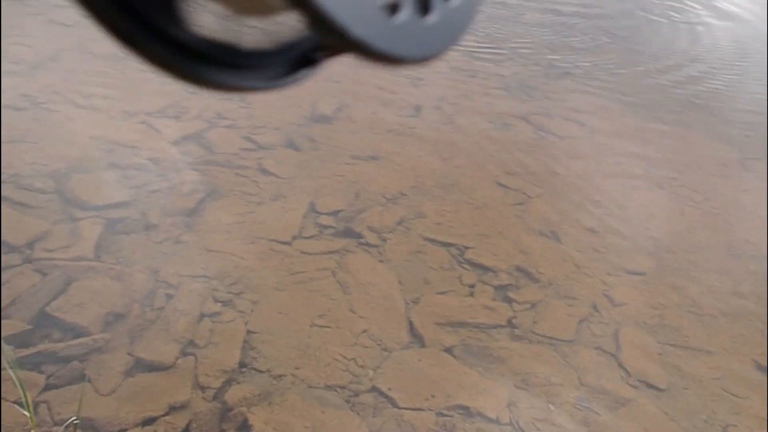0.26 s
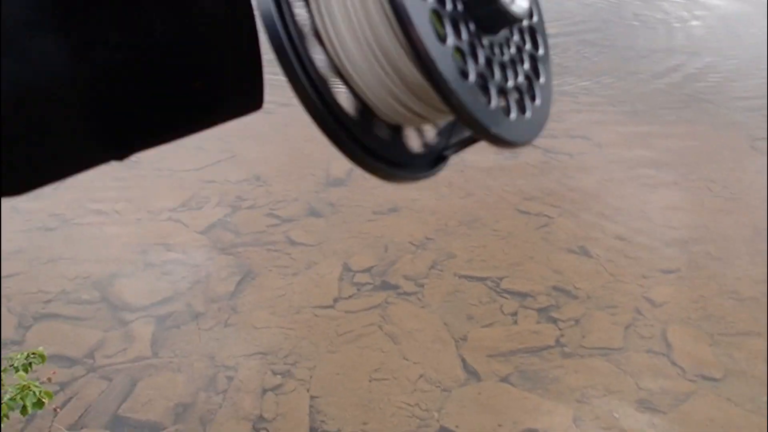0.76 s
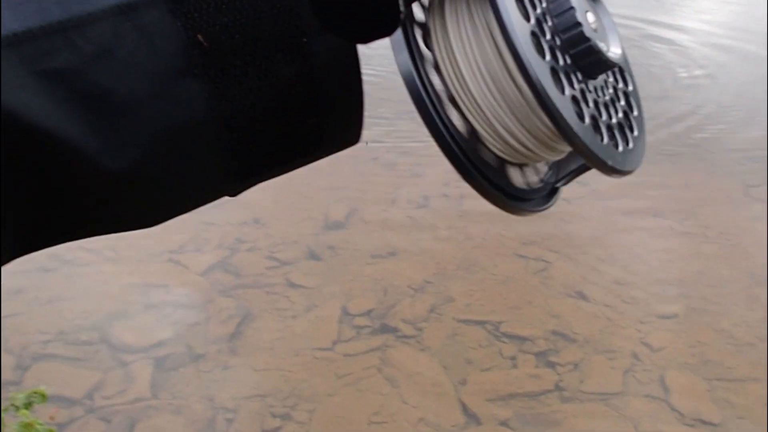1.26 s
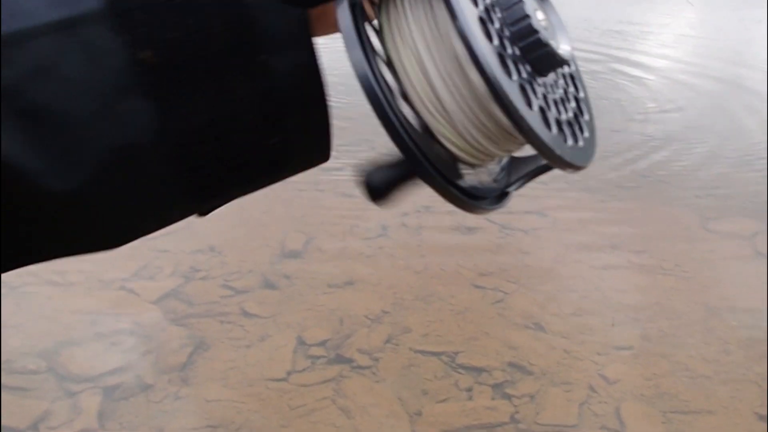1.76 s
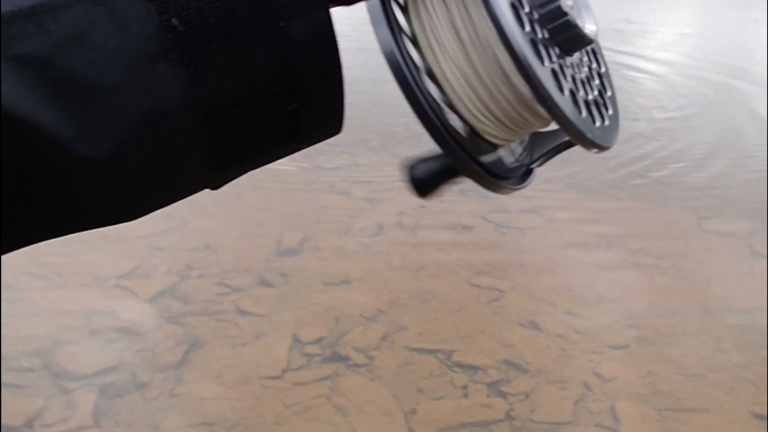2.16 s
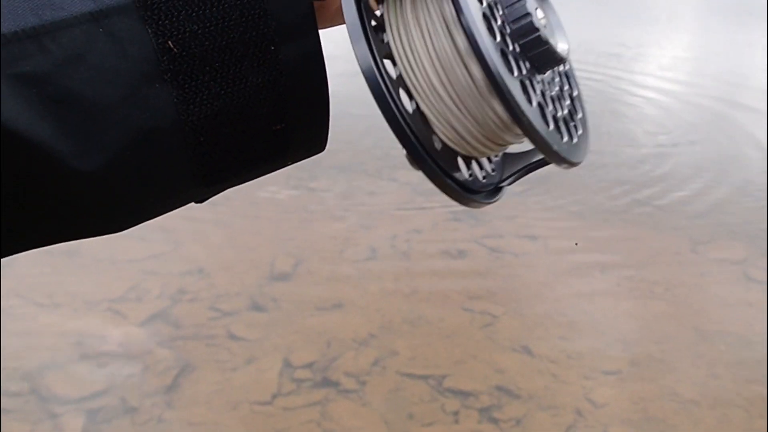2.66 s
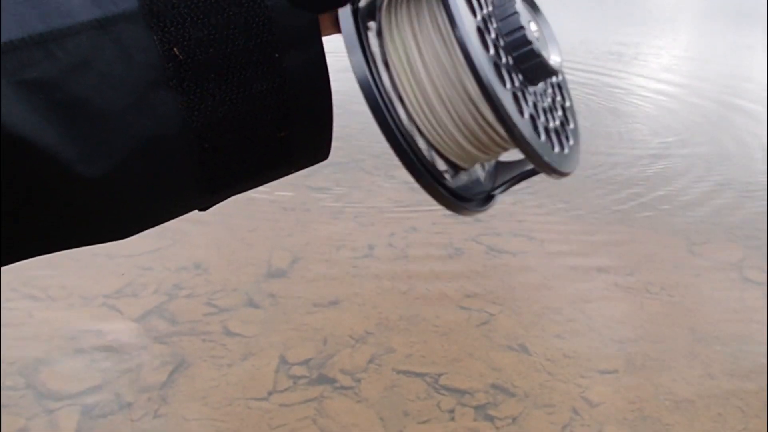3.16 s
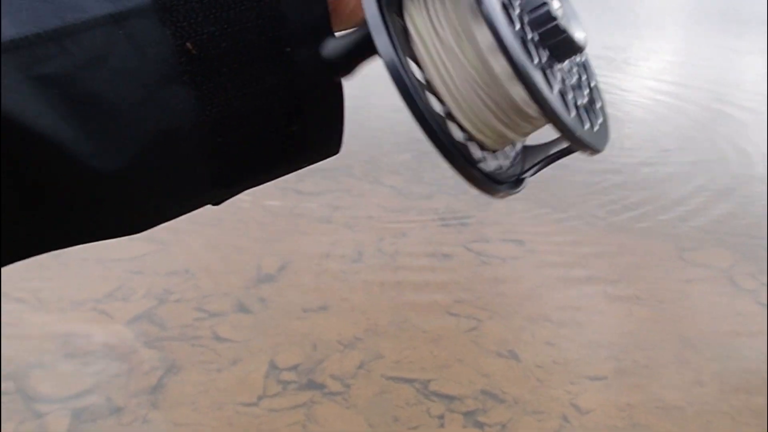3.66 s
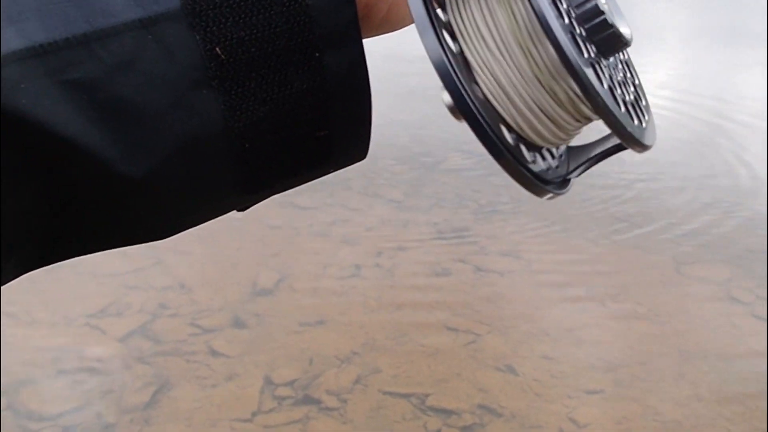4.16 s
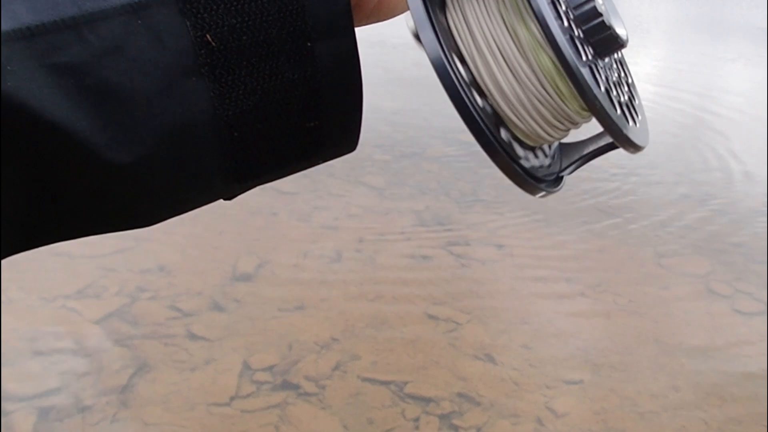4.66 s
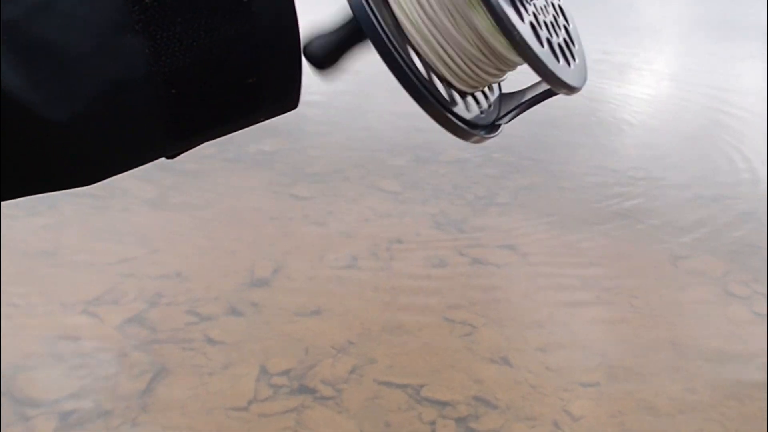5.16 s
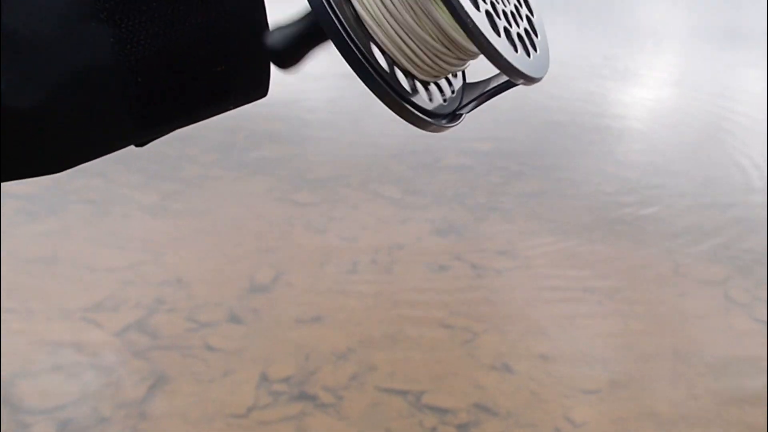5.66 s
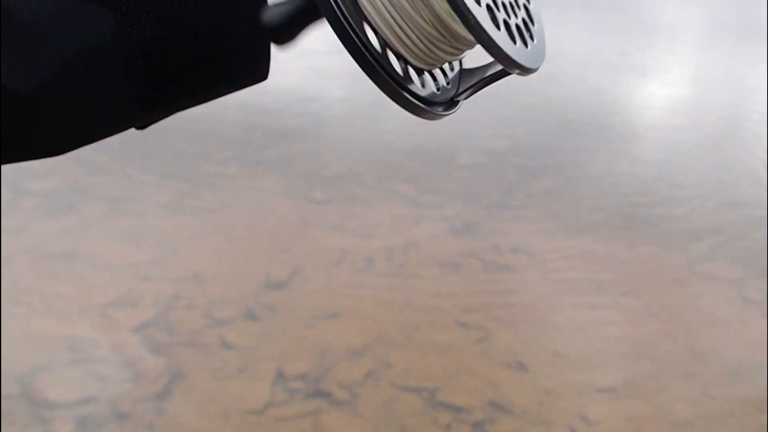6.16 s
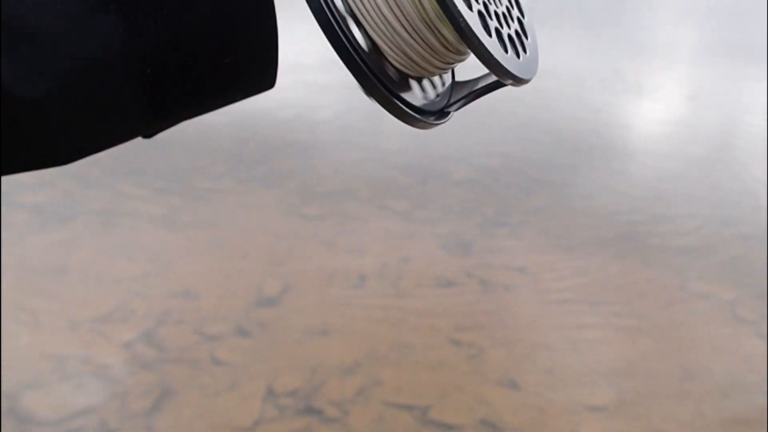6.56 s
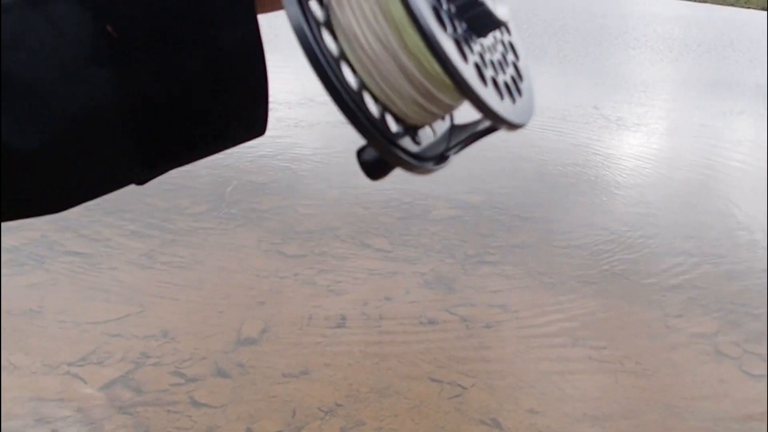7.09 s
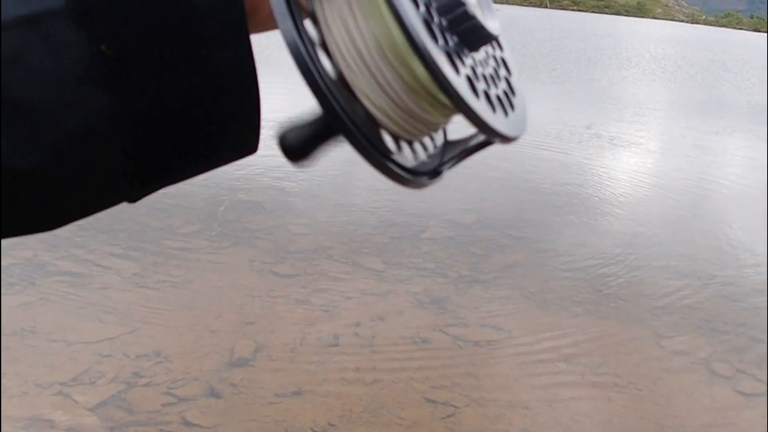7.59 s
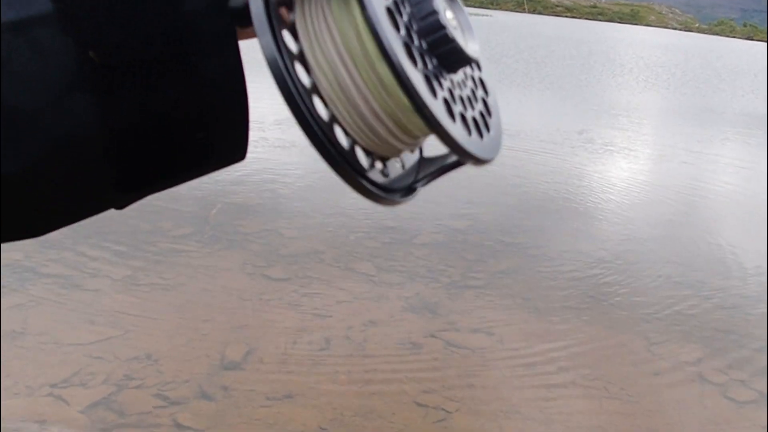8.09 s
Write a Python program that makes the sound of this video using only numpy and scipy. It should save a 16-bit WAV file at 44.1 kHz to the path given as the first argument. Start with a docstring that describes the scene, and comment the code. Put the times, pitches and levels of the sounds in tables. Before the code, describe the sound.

Close, high-pitched ratcheting of a fishing reel speeds up and slows as line pulls out, with faint finger knocks and distant water.

```python
"""Fly reel beside open water

Close on the reel, with a phone's two microphones. Line pays out in surges: a sprung pawl snaps over
the sixteen notches of the spool, which beams the clicks in lobes as it turns. Just as near, fingers
knock and rub on rod and reel and gusts thump the microphone ports. Water murmurs far behind."""
import sys
import numpy as np
from scipy import signal
from scipy.fft import rfft, irfft, next_fast_len
from scipy.io import wavfile
from scipy.ndimage import uniform_filter1d

SR = 44100
rng = np.random.default_rng(int(sys.argv[2]) if len(sys.argv) > 2 else 0)


def to_wav(s):
    """Save 16-bit WAV."""
    ch = np.atleast_2d(s).T  # columns
    pcm = np.round(np.clip(ch, -1, 1) * 32767)  # PCM
    wavfile.write(sys.argv[1], SR, pcm.astype(np.int16))


N = 367353

# turning of the spool, one table for each pull between two stops: (notches passed [count], time [s])
SPOOL_PULLS = [
    [(0, 0.0578), (2, 0.0848), (4, 0.109), (18, 0.298), (23, 0.3888), (25, 0.4467), (27, 0.5372),
     (31, 0.6763), (32, 0.7115), (42, 0.9447), (44, 1.0009), (45, 1.0203), (52, 1.1068), (60, 1.2155),
     (67, 1.3152), (70, 1.371), (71, 1.4032), (72, 1.467)],
    [(73, 1.7451), (75, 1.8083), (78, 1.8592), (80, 1.8854), (82, 1.9084), (98, 2.0801), (102, 2.1246),
     (109, 2.2363), (112, 2.304), (113, 2.3461), (114, 2.4279)],
    [(115, 2.5527)],
    [(116, 2.7269), (119, 2.9274), (120, 2.9667), (128, 3.1436), (129, 3.1627), (137, 3.2801),
     (139, 3.3211), (140, 3.3483), (141, 3.3713), (147, 3.5037), (151, 3.6369), (152, 3.6895),
     (153, 3.7286), (158, 3.8945), (159, 3.9406)],
    [(160, 4.0531), (161, 4.1482), (162, 4.1911), (164, 4.2913), (165, 4.3223), (170, 4.4123),
     (188, 4.6427), (196, 4.8158), (197, 4.8549), (198, 4.9068)],
    [(199, 5.1168), (200, 5.1659), (201, 5.1968), (212, 5.4187), (214, 5.4889), (215, 5.5468),
     (217, 5.6408), (219, 5.7419), (220, 5.7711), (223, 5.827), (242, 6.0667), (249, 6.1886), (251, 6.2569),
     (254, 6.4094), (255, 6.4555), (257, 6.5432), (259, 6.5983), (266, 6.7424), (280, 6.9918),
     (281, 7.0161), (286, 7.1424), (287, 7.1796), (288, 7.2434), (292, 7.4222), (294, 7.5064),
     (301, 7.7105), (302, 7.7461), (305, 7.854), (308, 7.9844), (311, 8.194)],
]
# resonances heard in each click, from reel and microphone ports together:
# (pitch [Hz], t60 [s], level [dB], left minus right [dB])
CLICK_RESONANCES = [(2916, 0.0062, -25.5, 2), (3558, 0.0064, -11.5, -15), (4800, 0.0032, -5.5, 7),
                    (5400, 0.0056, -4.5, 2), (6670, 0.0023, -24.5, -16), (7697, 0.0042, -6.5, -1.5),
                    (8496, 0.0045, -9, -2)]
# sway in pitch of each resonance, twice a turn: (depth [share of pitch], phase [turns])
PITCH_SWAY = [(0, 0), (0, 0), (.015, .3), (.015, .68), (0, 0), (.01, .5), (.01, .3)]
# the clicks as the hand holds the reel: (time [s], level [dB], treble gain [dB],
# third resonance gain [dB], fourth resonance pitch [Hz], fourth resonance t60 [s])
HAND_HOLD = [(0, 1.5, -3.5, 3, 5540, 0.0043), (.2, 6, 0, -6.5, 5440, .005),
             (.5, 3.5, -1.5, -1.5, 5370, 0.0042), (1, 1, -1, -3.5, 5250, 0.006),
             (1.35, 2, -3, -3, 5410, 0.0063), (2, 2, -3.5, -3.5, 5400, 0.0054),
             (2.6, 2, -3, -3, 5440, 0.0058), (3.3, 2, -3, -4, 5390, 0.0051), (4, 1, -2, -3, 5360, .0046),
             (4.6, 1.5, -2.5, 0.5, 5470, 0.005), (6, 1, -.5, 1, 5400, .0042),
             (6.5, 1, -0.5, -1, 5450, 0.0045), (7, 1, -1.5, -0.5, 5390, 0.0039),
             (7.6, 0, -1.5, 0, 5380, 0.004), (8.3, -0.5, -4.5, -1, 5290, 0.0047)]
# snap of the pawl above the resonances: (t60 [s], level [dB], spectrum as (frequency [Hz], level [dB]))
SNAP_BANDS = [(0.01, -28, [(8500, -15), (9600, -1), (11500, 0), (12200, -12), (13000, -37)]),
              (0.0061, -25, [(11500, -25.5), (12600, -8), (14500, -2.5), (15400, -1.5), (16500, -28)])]
# lobes in the level of each resonance, then each snap band, as the spool turns:
# (gain [dB], then depth [0-1] and phase [turns] for one, two and three lobes a turn)
SPOOL_LOBES = [(-1, 0.35, 0.77, 0.031, 0.089, .05, .89), (-3.5, 0.24, 0.74, 0.024, 0.38, .02, 0.58),
               (2, 0.4, 0.7, 0.42, 0.42, .12, 0.62), (2, 0.081, 0.12, 0.48, .32, 0.057, 0.088),
               (3.5, 0.15, 0.21, 0.15, 0.24, .5, 0.91), (-1.5, 0.62, 0.097, 0.1, 0.64, 0.2, 0.94),
               (1, 0.18, 0.6, 0.44, 0.28, 0.28, 0.91), (0, 0.25, 0.46, 0.12, 0.59, 0.11, 0.96),
               (4, 0.17, .03, .26, 0.3, 0.12, 0.34)]
# rattle of line and bearing: (frequency [Hz], level [dB])
WHIRR_SPECTRUM = [(1500, -23), (2600, 0.5), (3200, -1), (3550, 3), (4100, -3.5), (5200, 2.5), (6500, -17),
                  (8000, 0.5), (10000, -27), (15500, -25)]
# something hard ticks on the reel: (time [s], level [dB], pitch [Hz], t60 [s])
REEL_TICKS = [(0.8676, -8.5, 4420, 0.013), (0.972, -17, 5260, 0.011), (0.9786, -14, 6170, 0.028),
              (0.982, -12.5, 5880, 0.021), (0.9866, -19, 3250, 0.025), (0.9917, -19, 5230, 0.02),
              (1.015, -9.5, 5060, 0.014), (1.3923, -11.5, 7270, 0.016), (1.3961, -10, 5350, 0.016),
              (1.7945, -23, 3580, 0.022), (1.8035, -7, 3540, 0.018), (1.8182, -12, 4700, 0.029),
              (1.8484, -11.5, 5340, 0.014), (2.9004, -25, 4800, 0.015), (2.9068, -18.5, 4620, 0.041),
              (3.24, -21, 3700, 0.018), (3.246, -4, 4800, 0.0067), (3.3075, -14, 6960, 0.021),
              (3.326, -14, 3510, 0.017), (3.487, -32, 5350, 0.013), (6.756, -21, 7000, 0.008),
              (7.9563, -40, 5160, 0.017)]
# knocks on the rod grip: (time [s], level [dB], pitch struck hardest [Hz])
GRIP_KNOCKS = [(.107, -46, 920), (.25, -40, 581), (.376, -41.5, 1140), (0.539, -41, 414), (.69, -28, 640),
               (.815, -31.5, 1260), (.868, -23, 1720), (.939, -9.5, 656), (.972, -23, 1200),
               (1.041, -27.5, 678), (1.0775, -17, 1500), (1.391, -31, 1420), (1.769, -47, 1070),
               (1.808, -24, 1220), (1.928, -33.5, 1830), (2.238, -39, 549), (2.903, -35, 1780),
               (2.956, -37, 1470), (2.995, -40, 1480), (3.242, -21.5, 1520), (3.307, -25.5, 480),
               (3.3263, -19.5, 1150)]
# modes of the grip: (pitch [Hz], level [dB], t60 [s])
GRIP_MODES = [(150, -6, .05), (245, 5.5, 0.038), (660, 4.5, 0.026), (893, 5.5, 0.021), (1080, 2, 0.022),
              (1537, 6, 0.012), (1865, -0.5, 0.018)]
# sleeve and fingers rubbing, one table a stroke: (time [s], level [dB])
RUB_STROKES = [
    [(0.76, -48), (0.938, -40), (1.16, -46)],
    [(1.37, -56), (1.43, -51)],
    [(1.73, -44), (1.91, -44)],
    [(2.88, -55), (2.95, -44)],
    [(3.23, -40.5), (3.41, -44.5)],
    [(4.75, -52), (5.11, -53.5)],
    [(6.25, -49.5), (6.55, -58)],
]
# friction of cloth and skin: (frequency [Hz], level [dB])
RUB_SPECTRUM = [(150, -3.5), (500, -3.5), (1200, 2), (2300, -7.5), (3500, -3.5), (4100, -2), (5000, -9.5),
                (8000, -7), (10000, -21), (16000, -33)]
# sound scattered back by hands and water: (frequency [Hz], level [dB])
ECHO_SPECTRUM = [(300, -27), (2000, 11), (3150, 5), (3520, 12.5), (4000, 0.5), (8000, 3.5), (10000, -4),
                 (16000, -21)]
# strongest eddies: (time [s], level on the port struck harder [dB], left minus right [dB], length [s])
STRONG_EDDIES = [(0.006, -27, -13, 0.041), (2.471, -37.5, -12, 0.0085), (2.516, -35, -7, 0.032),
                 (2.66, -46, 0, 0.034), (3.461, -36, -12, 0.033), (3.489, -44, -20, 0.0091),
                 (3.7, -39, -20, 0.011), (4.192, -43, 14, 0.0085), (4.635, -39, -5, 0.039),
                 (4.676, -31, 18, 0.016), (4.82, -51, -4, 0.034), (6.53, -44.5, 18, 0.016),
                 (6.591, -30.5, 16, 0.025), (6.64, -26.5, -3.5, 0.024), (7.139, -42.5, -18, 0.021),
                 (7.249, -44, 18, 0.01), (7.629, -49, -40, 0.015), (8.32, -39, 26, 0.013)]
# spells of breeze that shed weak eddies: (start [s], end [s], level [dB])
BREEZE_SPELLS = [(2.0, 2.43, -46), (3.54, 3.78, -47), (3.9, 4.02, -48)]
# wind rumble on the ports: (frequency [Hz], level [dB])
WIND_SPECTRUM = [(20, -8), (45, -1), (100, -1.5), (250, -5.5), (400, -17), (800, -33), (2000, -70)]
# murmur of the distant water: (time [s], level [dB])
WATER_LEVEL = [(0.0, -51), (1.09, -50.5), (2.32, -54), (6.03, -53.5), (8.33, -55)]
# colour of that murmur: (frequency [Hz], level [dB])
WATER_SPECTRUM = [(18, -30), (30, 2.5), (100, -3), (350, -1), (650, -0.5), (860, -2), (1500, -1.5),
                  (1900, -2), (2300, -14.5), (3200, -4), (6000, -42)]
# steady hiss on each microphone: (frequency [Hz], level [dB])
HISS_SPECTRUM = [(1500, -7.5), (2600, -46.5), (3600, 9), (4100, -15), (5500, -1), (7700, 7.5), (9200, -1),
                 (15000, -2.5), (16500, -18)]

NOTCHES_PER_TURN = 16


def pawl(scatter_db=2.0, detune=0.014, port_slip_turns=0.029, snap_alike=0.7):
    """Close up: each drop rings all resonances, neighbours in opposite sense, under a treble snap."""
    times = drop_times()
    angle = np.arange(len(times)) / NOTCHES_PER_TURN
    hold = [column[(times * SR).astype(int)] for column in curve(HAND_HOLD)]
    level_db, treble_db, third_db, fourth_hz, fourth_t60 = hold
    beamed = [lobe_gain(row, angle) * undb(level_db + (k >= 4) * treble_db + (k == 2) * third_db)
              for k, row in enumerate(SPOOL_LOBES)]
    out = 0
    for k, (hz, t60, db, left_db) in enumerate(CLICK_RESONANCES):
        if k == 3:
            hz, t60 = fourth_hz, fourth_t60
        force, mistune, jitter, slip = rng.standard_normal((len(times), 4)).T
        gain = beamed[k] * undb(db + scatter_db * force)
        depth, sway_phase = PITCH_SWAY[k]
        pitch = hz * (1 + depth * np.cos(2 * np.pi * (2 * angle - sway_phase)) + detune * mistune)
        phase = 0.1 * jitter + k / 2
        rise = t60 / 9  # each ring swells briefly before dying, which softens the click
        ports = [ring(times, gain, pitch, t60, rise, phase + side * port_slip_turns * slip)
                 for side in (1, -1)]
        out += pan(np.array(ports), left_db)
    for k, (t60, db, spectrum) in enumerate(SNAP_BANDS, len(CLICK_RESONANCES)):
        envelope = decays(times, beamed[k] * undb(db), t60, rise=0.00029)
        grit = blend(rng.standard_normal(N), rng.standard_normal((2, N)), snap_alike)
        out += pan(envelope * colour(grit, spectrum), left_db=-2.5)
    return out


def drop_times():
    """The pawl drops whenever the spool has turned by one more notch."""
    return np.concatenate([spline(notches, times, np.arange(notches[0], notches[-1] + 1))
                           for notches, times in map(np.transpose, SPOOL_PULLS)])


def lobe_gain(row, angle):
    """Gain towards the phone at each angle [turns] of the spool."""
    db, *lobes = row
    swing = sum(depth * np.cos(2 * np.pi * (count * angle - phase))
                for count, (depth, phase) in enumerate(np.reshape(lobes, (-1, 2)), 1))
    return undb(db) * np.abs(1 + swing)


def whirr(db=-46, speed_power=0.69, grain_db=3):
    """Line and bearing rattle louder the faster the spool turns."""
    times = drop_times()
    midpoints = (times[1:] + times[:-1]) / 2
    speed = curve(np.c_[midpoints, 1 / np.diff(times) / 80])[0]  # 1 at eighty notches a second
    grains = rng.standard_normal((2, N)) * undb(grain_db * flicker(300))
    gain = undb(db + curve(HAND_HOLD)[0]) * speed ** speed_power
    return pan(colour(grains, WHIRR_SPECTRUM) * gain, left_db=-3)


def ticks(crack_db=-1, detune=0.096):
    """A hard touch on the reel rings one partial over a short crack of the click resonances."""
    times, db, hz, t60 = np.transpose(REEL_TICKS)
    partial = ring(times, undb(db), hz, t60, rise=0.0016, phase=rng.random(len(times)))
    out = pan(partial, left_db=-2.9)
    loudest_db = CLICK_RESONANCES[3][2]
    for ring_hz, ring_t60, ring_db, left_db in CLICK_RESONANCES:
        mistune, phase = rng.standard_normal((len(times), 2)).T
        gain = undb(db + crack_db + ring_db - loudest_db)
        pitch = ring_hz * (1 + detune * mistune)
        out += pan(ring(times, gain, pitch, ring_t60, rise=0.0001, phase=phase), left_db)
    return out


def knocks(db_per_octave=12, scuff_db=-12, detune=0.015):
    """Fingers knock the grip, whose modes fall off away from the pitch struck hardest; skin scuffs."""
    times, db, centre_hz = np.transpose(GRIP_KNOCKS)
    scuffs = decays(times, undb(db + scuff_db), t60=0.08, rise=0.002)
    out = scuffs * colour(rng.standard_normal(N), RUB_SPECTRUM)
    for hz, mode_db, t60 in GRIP_MODES:
        gain = undb(db + mode_db - db_per_octave * np.abs(np.log2(hz / centre_hz)))
        pitch = hz * (1 + detune * rng.standard_normal(len(times)))
        out += ring(times, gain, pitch, t60, rise=0.00032)
    return pan(out, left_db=-6)


def rubs(grain_db=4):
    """Sleeve and fingers scrape in dense uneven grains, close by on the right."""
    t = np.arange(N) / SR
    touching = sum((t >= stroke[0][0]) & (t <= stroke[-1][0]) for stroke in RUB_STROKES)
    gate = uniform_filter1d(touching.astype(float), size=600)
    gain = undb(curve(np.vstack(RUB_STROKES))[0]) * gate
    grains = rng.standard_normal(N) * undb(grain_db * flicker(250))
    return pan(colour(grains, RUB_SPECTRUM) * gain, left_db=-6)


def echo(x, lag_s, t60, db):
    """A nearby surface scatters sound back to the microphones, late and dying away."""
    size = int(t60 * SR)
    noise = colour(rng.standard_normal((2, N)), ECHO_SPECTRUM)[:, :size]
    tail = noise * undb(db - 60 * np.arange(size) / size)
    delayed = np.pad(tail, ((0, 0), (int(lag_s * SR), 0)))
    return signal.fftconvolve(x, delayed, axes=1)[:, :N]


def gusts(thump_hz=98, pitch_spread=0.2, rumble_db=-1):
    """Wind right on the ports: each eddy is a bell-shaped swell of thump and rumble, unlike on each."""
    t = np.arange(N) / SR
    rumble = undb(rumble_db) * colour(rng.standard_normal((2, N)), WIND_SPECTRUM)
    out = np.zeros((2, N))
    for time, db, left_db, length in STRONG_EDDIES + weak_eddies():
        mistune, phase = rng.standard_normal((2, 2, 1))
        span = slice(max(int((time - 2 * length) * SR), 0), int((time + 2 * length) * SR))
        age = t[span] - time
        pitch = thump_hz * np.exp(pitch_spread * mistune)
        thump = np.sin(2 * np.pi * (pitch * age + phase))
        swell = np.exp(-2 * (age / length) ** 2)
        port_gain = undb(db + np.minimum([[left_db], [-left_db]], 0))
        out[:, span] += port_gain * swell * (thump + rumble[:, span])
    return out


def weak_eddies(per_second=22, scatter_db=3, side_db=9, length_s=0.015):
    """The breeze sheds eddies at uneven gaps; rows as in STRONG_EDDIES."""
    rows = []
    for start, end, db in BREEZE_SPELLS:
        times = np.arange(start, end, 1 / per_second)
        jitter, force, side, stretch = rng.standard_normal((len(times), 4)).T
        rows += zip(times + 0.187 * jitter / per_second, db + scatter_db * force,
                    side_db * side, length_s * np.exp(0.38 * stretch))
    return rows


def water(alike=0.47, flicker_db=2, hiss_db=-53):
    """Open water murmurs far off, partly shared by the microphones, over a hiss of each one's own."""
    shared = rng.standard_normal(N) * undb(flicker_db * flicker(25))
    noise = blend(shared, rng.standard_normal((2, N)), alike)
    murmur = colour(noise, WATER_SPECTRUM) * undb(curve(WATER_LEVEL)[0])
    hiss = colour(rng.standard_normal((2, N)), HISS_SPECTRUM) * undb(hiss_db)
    return pan(murmur, left_db=-6) + pan(hiss, left_db=-1.7)


def ring(times, gain, hz, t60, rise, phase=0):
    """One dying sine for each blow, summed on one track; t60 and rise in seconds, phase in turns."""
    gain, hz, t60, rise, phase = (np.reshape(v, (-1, 1)) for v in (gain, hz, t60, rise, phase))
    t = np.arange(int(SR * t60.max()) + 1) / SR
    envelope = gain * (1 - np.exp(-t / rise)) ** 2 * undb(-60 * t / t60)
    waves = envelope * np.sin(2 * np.pi * (hz * t + phase))
    samples = (times * SR).astype(int)[:, None] + np.arange(len(t))
    return np.bincount(samples.ravel(), waves.ravel(), N + SR)[:N]


def decays(times, gain, t60, rise):
    """The envelopes of the blows alone, with no tone."""
    return ring(times, gain, 0, t60, rise, phase=1 / 4)


def colour(x, spectrum):
    """Filters by (frequency [Hz], level [dB]) points, then scales to rms 1."""
    size = next_fast_len(N)
    hz, db = np.transpose(spectrum)
    bins_hz = np.maximum(np.arange(size // 2 + 1) * SR / size, 1)
    gain = undb(np.interp(np.log(bins_hz), np.log(hz), db))
    y = irfft(rfft(x, size) * gain, size)[..., :N]
    return y / np.sqrt(np.mean(y ** 2))


def flicker(rate_hz):
    """Random steps, smoothed twice."""
    hold = int(SR / rate_hz)
    steps = np.repeat(rng.standard_normal(N // hold + 1), hold)
    return uniform_filter1d(uniform_filter1d(steps, hold), hold)[:N]


def spline(knots, values, at):
    """The smoothest curve through the points (natural cubic spline)."""
    def basis(x):
        return np.c_[np.abs(x[:, None] - knots) ** 3, x, np.ones_like(x)]
    straight_ends = np.c_[np.array([knots, np.ones_like(knots)]), np.zeros((2, 2))]
    weights = np.linalg.lstsq(np.r_[basis(knots), straight_ends], np.r_[values, 0, 0], rcond=None)[0]
    return basis(at) @ weights


def curve(rows):
    """Each value column of (time [s], values...) rows, at every sample."""
    times, *columns = np.transpose(rows)
    return [np.interp(np.arange(N) / SR, times, column) for column in columns]


def blend(shared, own, alike):
    """Mixes noise common to both microphones with each one's own."""
    return np.sqrt(alike) * shared + np.sqrt(1 - alike) * own


def pan(x, left_db):
    """Stereo, with left_db as left minus right."""
    return x * undb([[left_db / 2], [-left_db / 2]])


def undb(db):
    return 10 ** (np.asarray(db) / 20)


def scene():
    """Reel and hands up close, wind on the ports, water far behind."""
    clicks = pawl()
    bounce = undb(-27) * np.roll(clicks, int(0.001116 * SR), axis=1)  # the pawl bounces once on its seat
    near = clicks + bounce + ticks() + knocks()
    off_hands = echo(near, lag_s=0.00091, t60=0.013, db=-29)  # hands and sleeve scatter first
    off_water = echo(near, lag_s=0.008, t60=0.075, db=-50.5)  # then the water below
    return near + off_hands + off_water + whirr() + rubs() + gusts() + water()


def record(dry, ceiling=0.97, top_hz=16600):
    """The phone rolls off the deep bass and highest treble, rounds the loudest peaks and cuts the top."""
    low_cut = signal.sosfilt(signal.butter(2, 60, "high", fs=SR, output="sos"), dry)
    softened = signal.sosfilt(signal.butter(3, 16000, fs=SR, output="sos"), low_cut)
    rounded = ceiling * np.tanh(softened / ceiling)
    return signal.sosfilt(signal.ellip(8, 0.2, 70, top_hz, fs=SR, output="sos"), rounded)


dry = scene()
out = record(dry)
to_wav(out)
```